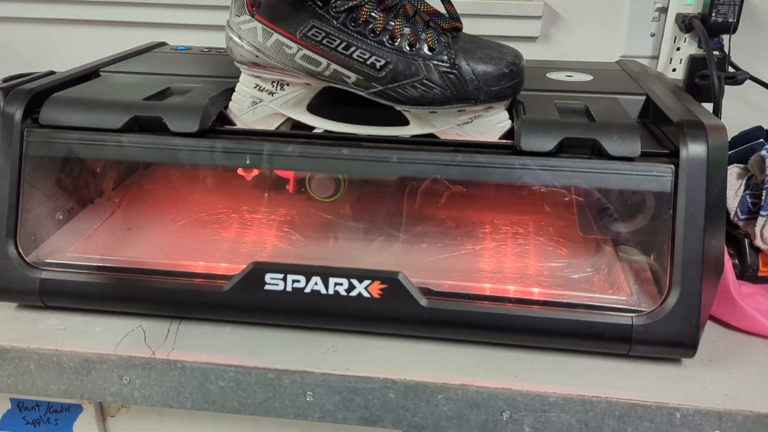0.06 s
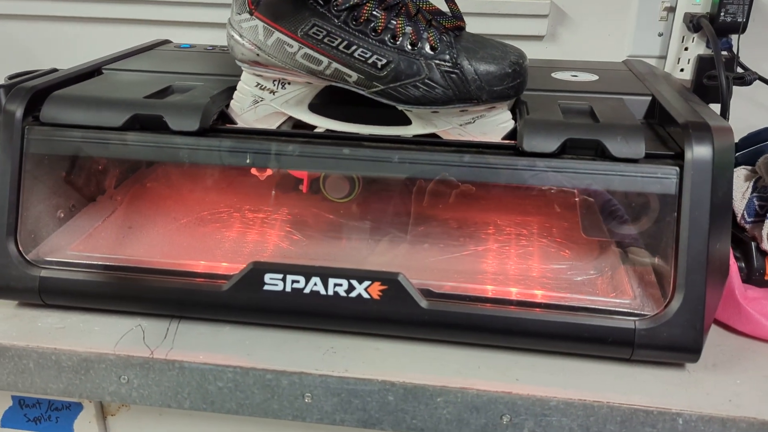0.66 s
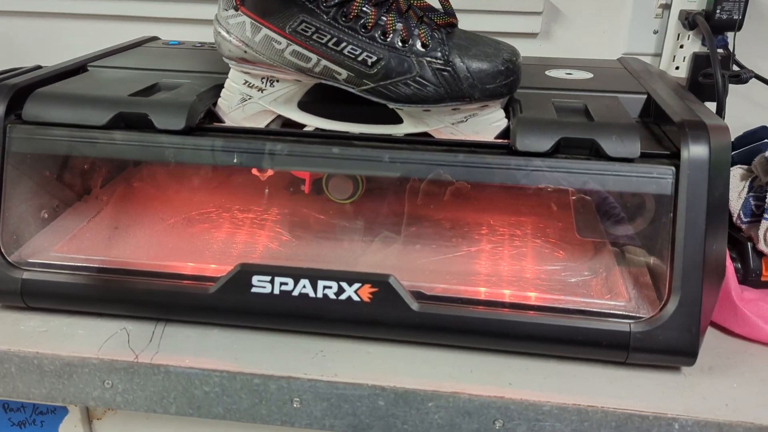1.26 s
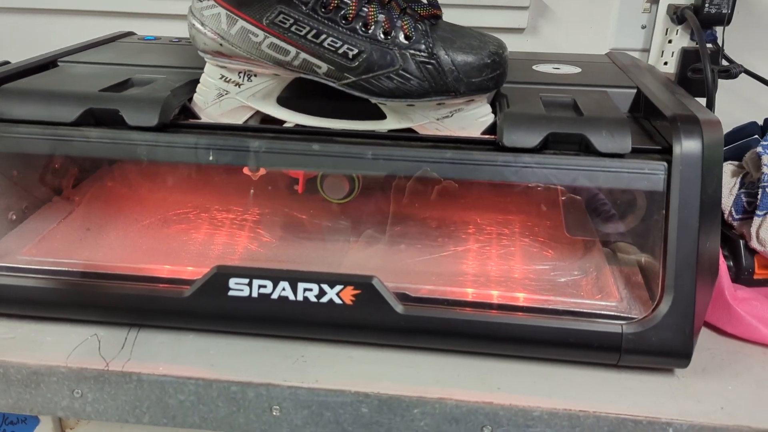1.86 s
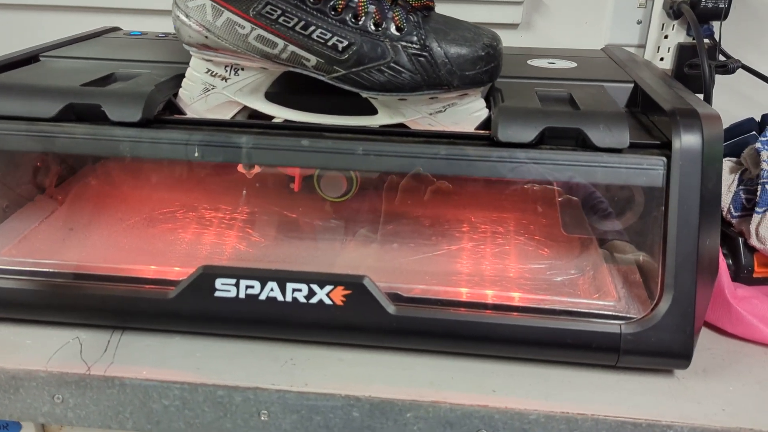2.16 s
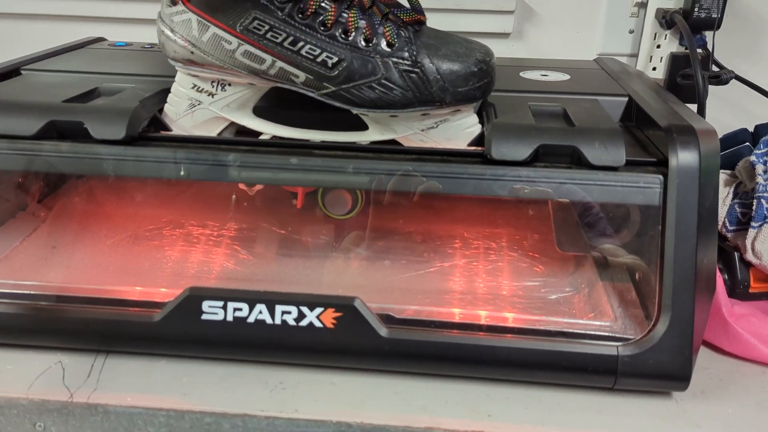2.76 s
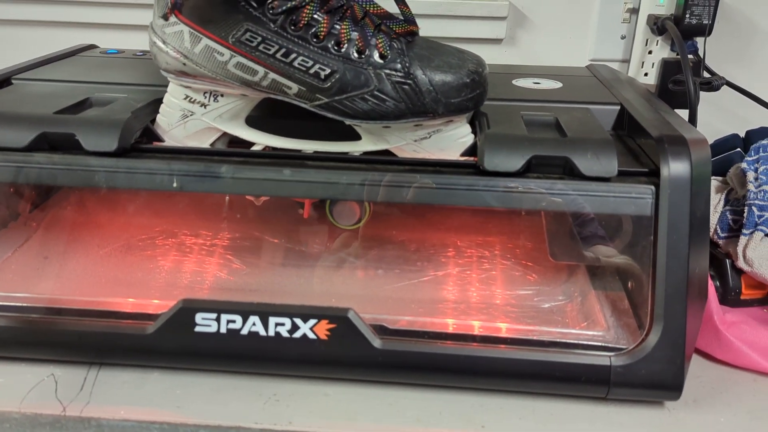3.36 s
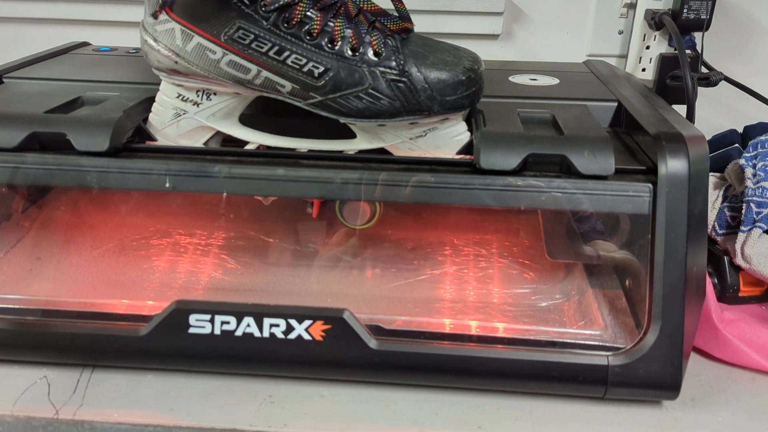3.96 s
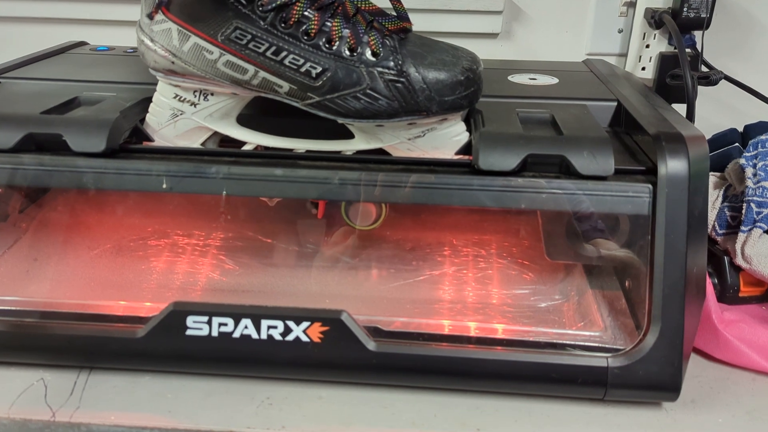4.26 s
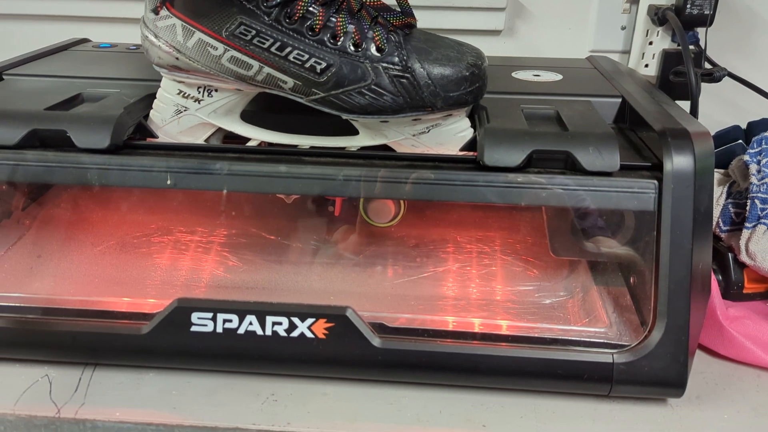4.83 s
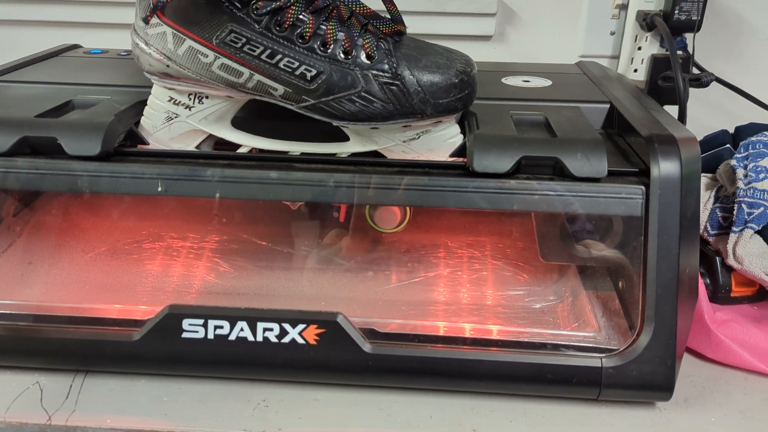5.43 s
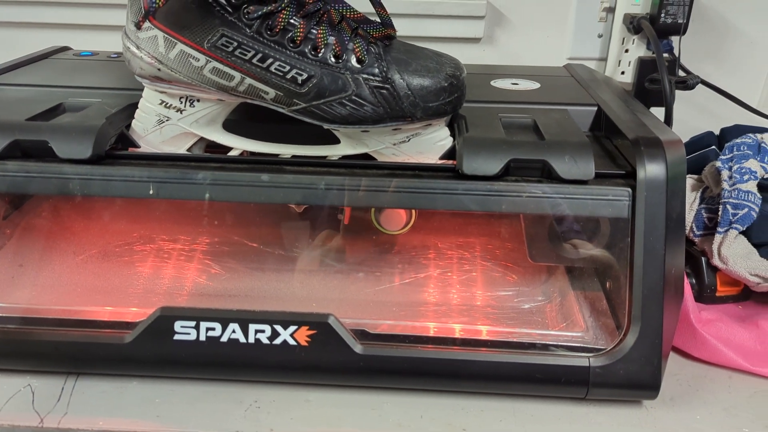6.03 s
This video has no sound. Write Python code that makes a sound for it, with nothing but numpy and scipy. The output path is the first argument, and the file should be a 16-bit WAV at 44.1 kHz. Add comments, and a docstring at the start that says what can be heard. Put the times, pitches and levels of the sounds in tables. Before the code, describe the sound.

An electric skate sharpener hums and buzzes steadily as its wheel grinds a steel blade, turning rougher, with hiss and rattling.

```python
"""A motor hums and buzzes over a soft rush of air: an electric skate sharpener and its dust fan.
The motor pulses about 120 times a second. Its grinding wheel touches the blade and travels along it,
so the steel rasps, rings and hisses, and the sound drifts from the left toward the middle.
As the wheel presses harder, its off-balance shaft beats against the hum, turning it rough,
and the plastic cabinet rattles in a small workshop."""
import sys
import numpy as np
from scipy import signal
from scipy.fft import rfft, irfft
from scipy.io import wavfile
from scipy.ndimage import uniform_filter1d

SR = 44100
rng = np.random.default_rng(int(sys.argv[2]) if len(sys.argv) > 2 else 0)


def bounce(signal):
    """Save signal as a 16-bit WAV file at the path given by the first command-line argument."""
    frames = np.transpose(np.atleast_2d(signal))
    limited = np.clip(frames, -1, 1)
    pcm = np.round(limited * 32767).astype(np.int16)
    wavfile.write(sys.argv[1], SR, pcm)


N = 268566
T = np.arange(N) / SR
FREQS = np.arange(N // 2 + 1) * SR / N
SIDES = np.array([[1], [-1]])  # plus for left, minus for right

# Tone colours, showing which pitches are strong and which are weak: pitch_hz, relative_db
AIR_COLOUR = [(28, -47), (42, -18.5), (80, -18), (130, -12), (190, -4.5), (250, -13), (330, -13.5),
              (800, -15), (2000, -21.5), (3400, -30.5), (6000, -32)]  # air rushing through the fan
GRIT_COLOUR = [(400, 10), (1200, 9.5), (2100, 12), (3200, 11), (4300, 16.5), (5700, -8), (6700, 4),
               (9600, -20), (11500, 3), (15500, -20)]  # grit scraping steel
BUZZ_COLOUR = [(2000, -3), (2500, 3), (3300, -3.5), (4100, 4.5), (4900, -4), (5700, -14.5), (6400, 4.5),
               (7300, -1.5), (8600, 6), (9600, -4), (10700, 4.5), (13000, 5), (14400, 2.5), (15400, -1)]  # the wheel ticking on the blade
COVER_COLOUR = [(400, -22), (700, -5), (1120, -18.5), (1420, -1), (1950, -0.5), (2500, -4.5), (3200, -16.5),
                (4200, -20.5), (5700, -17.5), (7000, -12), (9500, -17.5), (15000, -31)]  # the thin cover rattling
HOUSING_COLOUR = [(250, -27), (420, -9), (540, -4.5), (660, -4), (830, -8), (1000, -10), (1130, -16.5),
                  (1400, -2), (1800, -6.5), (3000, -38.5)]  # the housing growling
# How much the two ears differ, compared with what they share: pitch_hz, difference_db
STEREO_WIDTH = [(60, -5), (150, -65), (250, -18.5), (500, -9), (1000, -5), (2000, 0), (4000, 0),
                (15000, 2.5)]
# Tones of the dust fan: pitch_hz, level_db
FAN_TONES = [(273.5, -45.5), (368.3, -44)]
# Rings of wheel and blade, each swelling as the wheel passes its place:
# pitch_hz, width_hz, loudest_s, spread_s, level_db, left_minus_right_db
STEEL_RINGS = [(2776, 100, 6.5, 1.5, -43, 16), (2900, 640, -1.5, 2.7, -48, 18),
               (2920, 100, 0.2, .55, -47, -4), (3770, 46, 6, 2.5, -49, -14), (3760, 77, 0.35, 1.2, -42, -2),
               (4350, 800, 1, 1.5, -48, -2), (4462, 170, 4, 1.54, -41.5, -3), (4860, 60, 3.3, .8, -48, 0),
               (5240, 190, 2.9, 1.5, -40, 3), (6120, 830, 8, 1.2, -44, 5), (6100, 60, 1.2, 0.59, -48, -6),
               (6433, 400, 4, 0.87, -45.5, 15.5), (6720, 76, 1.8, 0.32, -42.5, 1),
               (6730, 240, 5.5, .6, -40, -9), (6760, 380, 1.7, 1.6, -38, -5.5),
               (7350, 67, 2, 1.5, -43.5, 1), (8140, 740, 1.5, .8, -43, 0), (8230, 800, 6, 0.66, -39.5, 0),
               (9240, 220, 2, 1.8, -47, 10), (10200, 350, -0.7, 1.2, -37, 1),
               (10266, 300, 3, 0.68, -40, -3), (10270, 270, 4.5, 0.32, -38.5, 0),
               (10870, 60, 0, .43, -49, -6), (11105, 200, .95, .85, -38, 0),
               (11041, 320, 3.5, .6, -40.5, 1), (11075, 300, 5.75, .53, -34.8, -3),
               (11850, 110, -1, 1.4, -40.5, 5), (11850, 60, 6, .63, -47, 2), (12700, 61, 1, 2, -44, 9),
               (13000, 900, 7, 3.9, -47, 15), (14300, 210, 0, 2.8, -45, 2)]
# Rings that rasp in turn as the wheel digs in: pitch_hz, width_hz, loudest_s, spread_s, level_db
RASP_RINGS = [(2095, 1050, 1.2, 0.34, -39.5), (1973, 1150, 1.84, 0.25, -39.5), (2160, 460, 2.54, 0.26, -36),
              (1960, 700, 3.2, 0.48, -34.5), (7850, 1100, 1.7, 0.45, -46)]
# Tones made by hum and shaft together: pulse_multiple, shaft_multiple, level_db
BEAT_TONES = [(0, 1, -42), (1, 1, -42), (2, 1, -53), (3, 1, -37.8), (3, 2, -43), (4, 1, -31.3), (4, 2, -42),
              (5, -1, -41), (5, 1, -44), (6, -2, -41), (6, -1, -40), (6, 1, -48), (7, -1, -47),
              (7, -3, -48.5), (7, 1, -50), (7, 2, -48.5), (8, -4, -52), (8, -1, -55), (9, -3, -48),
              (9, -1, -46), (9, 1, -44), (10, -2, -48.5), (12, -1, -47.5), (13, 1, -46)]
# The hum's harmonics (tones at whole multiples of the pulse rate): multiple, smooth_db, chattering_db
HUM_HARMONICS = [(1, -33.5, -31), (3, -48, -45.5), (4, -45, -33.5), (5, -42.5, -36.5), (6, -44.5, -42.5),
                 (7, -44.5, -36.5), (8, -59.5, -39), (9, -51.5, -65), (10, -40, -38.5), (11, -43, -63),
                 (12, -31.5, -35.5), (13, -50, -69), (14, -29.5, -44), (15, -36, -45), (16, -32.5, -40),
                 (17, -39, -39.5), (18, -47.5, -54.5), (19, -44, -56), (20, -40.5, -53), (23, -48, -47)]
# Harmonics swell or sink as the wheel passes the cabinet's lively and still spots:
# multiple, centre_s, spread_s, added_db
HUM_SWELLS = [(4, 2.94, 0.556, -9), (7, 5.55, 0.87, -7.5), (8, 2.07, 0.535, 10.5), (8, 3.33, 0.65, -12),
              (9, 0.23, 0.546, 7), (10, 2.23, 0.6, 5.5), (12, 1.9, 0.55, -5.5), (14, 0.54, 0.274, -4),
              (14, 2.1, 0.466, -8), (14, 6.54, 1.01, 3.5), (15, 1.99, 1.04, -9), (15, 5.93, 0.68, 5),
              (16, 0.587, 0.51, 6), (16, 3.0, 0.5, 7.5), (16, 4.1, 0.85, 11.5)]

PULSE_HZ, SHAFT_HZ = 119.72, 87.9  # motor pulses and shaft turns each second
TOUCH_S, LOAD_S, TOE_S = 0.82, 2.6, 5.1  # the wheel meets the blade, presses in, climbs its curved toe
# Each part's starting level and what each stage adds at a strength of 1:
# start_db, touch_db, bite_db, load_db, toe_db
AIR_DB = (-37.5, 2.5, 0, 2.5, 1)
HISS_DB = (-55, -1.5, 1.5, 21.5, -8)
BUZZ_DB = (-37.5, -0.34, 1.8, 0, 1)
RATTLE_DB = (-54, 12, 1, 0.95, 6.5)
BODY_DB = (-27, 0.5, -1, 5.5, 1.5)  # the hum's second harmonic
BOOM_DB = (0.5, 12.5, 4.5, 6.5, 2)  # the front panel's boost, which fades out once the wheel chatters


def undb(db):
    """Turn decibels into a number to multiply a sound by."""
    return 10 ** (np.asarray(db) / 20)


def unit(x):
    """Scale a sound to an average (rms) strength of 1."""
    return x / np.sqrt(np.mean(x ** 2))


def shape(points, hz):
    """Read a table of pitch_hz, level_db as a gain at the given pitches."""
    pitches, db = np.transpose(points)
    return undb(np.interp(np.log(hz + 1e-3), np.log(pitches), db))


def bell(hz, centre_hz, width_hz):
    """How strongly a ringing part answers a pitch: 1 at its centre, less to either side."""
    return 1 / (1 + (2 * (hz - centre_hz) / width_hz) ** 2)


def wander(rate_hz):
    """A smooth random drift, typically about 1 above or below zero."""
    hold = int(SR / rate_hz)
    steps = np.repeat(rng.standard_normal(N // hold + 2), hold)
    return 1.2555 * uniform_filter1d(uniform_filter1d(steps, hold), hold)[:N]


def rise(at_s, rise_s):
    """A smooth step from 0 to 1, halfway up at at_s."""
    return .5 + .5 * np.tanh((T - at_s) / rise_s / 2)


def radiate(pair, gain):
    """Colour two sounds: one is shared by both ears (at strength 1), the other sets them apart."""
    mid = irfft(rfft(pair[0]) * gain, N)
    side = irfft(rfft(pair[1]) * gain * shape(STEREO_WIDTH, FREQS), N)
    return np.array([mid + side, mid - side]) / np.std(mid)


def clicks(times_s, sizes):
    """Clean clicks that can fall between two samples."""
    at = times_s[:, None] * SR
    index = np.floor(at).astype(int) + np.arange(-7, 9)
    click = np.sinc(index - at) * np.sinc((index - at) / 8)
    inside = (index >= 0) & (index < N)
    return np.bincount(index[inside], (sizes[:, None] * click)[inside], N)


def cabinet(strikes, ring_s, room_db, rise_s=0.0016, echo_s=0.28):
    """Strikes leave the cabinet by two paths, each a short ring followed by the workshop's echo."""
    t = T[:SR // 4]
    ring = unit((1 - np.exp(-t / rise_s)) * np.exp(-t / ring_s))
    echo = unit(np.exp(-np.log(1000) * t / echo_s))
    paths = rfft(rng.standard_normal((2, len(t))) * (ring + undb(room_db) * echo))
    # many overlapping rings share the energy evenly from low to high
    paths = paths / np.sqrt(uniform_filter1d(abs(paths) ** 2, size=60))
    return irfft(rfft(strikes) * rfft(irfft(paths), N), N)


def lateness(hz):
    """Higher tones leave the cabinet later, by this share of a pulse."""
    return 0.1952 * np.clip((hz - 300) / 900, 0, 1)


def dust_fan(air_db, gust_db=3.0):
    """The fan makes a low rush of air and two wavering tones."""
    air = radiate(rng.standard_normal((2, N)), shape(AIR_COLOUR, FREQS))
    air *= undb(air_db + gust_db * np.tanh(wander(7.5)))
    for hz, db in FAN_TONES:
        level = np.sqrt(2) * undb(db + 0.83 * wander(4.27))
        pitch_hz = hz * (1 + 0.00315 * wander(1.8))
        air += level * np.sin(2 * np.pi * np.cumsum(pitch_hz) / SR)
    return air


def grit_hiss(pulses, turns, chop=0.12, wobble=0.099):
    """Grit scrapes the steel, a little harder with each motor pulse and each shaft turn."""
    contact = np.exp(chop * np.cos(2 * np.pi * (pulses - .4)) + wobble * np.sin(2 * np.pi * turns))
    scrape = rng.standard_normal((2, N)) * contact * undb(.3 * wander(14))
    return radiate(scrape, shape(GRIT_COLOUR, FREQS))


def steel_rings(pulses, turns, load, sway=0.25, waver_db=1.74, wave_size=32768):
    """Each ring of wheel and blade sings on the few motor harmonics that lie near its pitch."""
    out = np.zeros((2, N))
    # one stored wave repeats every pulse, peaking shortly after it
    place = ((pulses - .3) * wave_size).astype(int) % wave_size
    for hz, width_hz, at_s, spread_s, db, lean_db in STEEL_RINGS:
        swell = undb(db + waver_db * wander(4.04)) / np.sqrt(1 + ((T - at_s) / spread_s) ** 4)
        # under load the contact sways as pulses and turns slip in and out of step
        drift = sway * load * np.sin(2 * np.pi * (pulses - turns + rng.random()))
        nearby = round(hz / PULSE_HZ) + np.arange(-4, 5)
        gains = bell(nearby * PULSE_HZ, hz, width_hz)
        angles = 1.104 * rng.standard_normal(len(nearby))
        harmonics = np.zeros(wave_size, complex)
        harmonics[nearby] = gains / np.linalg.norm(gains) * np.exp(1j * angles)
        ring = wave_size * np.fft.ifft(harmonics)[place] * swell * np.exp(1j * drift)
        # the two ears hear it a quarter of a wave apart
        ears = np.array([ring.real, rng.choice([-1, 1]) * ring.imag])
        out += np.sqrt(2) * undb(lean_db * SIDES / 2) * ears
    return out


def wheel_rasp(pulse_s, pan_db, jitter_s=0.00012, scatter_db=3.0, rebound_db=-3):
    """The wheel skips unevenly on the steel, twice a pulse, waking one ring after another."""
    chance = rng.standard_normal((len(pulse_s), 4)).T
    skips = clicks(pulse_s + jitter_s * chance[0], undb(scatter_db * chance[1]))
    rebound_s = pulse_s + .5 / PULSE_HZ + jitter_s * chance[2]
    skips += clicks(rebound_s, undb(rebound_db + scatter_db * chance[3]))
    ring = cabinet(skips, ring_s=.0018, room_db=-4, rise_s=.0004)
    out = 0
    for hz, width_hz, at_s, spread_s, db in RASP_RINGS:
        lean_db = pan_db * bell(hz, centre_hz=2050, width_hz=2000)
        swell = np.exp(-((T - at_s) / spread_s) ** 2 / 2)
        out += radiate(ring, bell(FREQS, hz, width_hz) ** 2) * undb(db + lean_db * SIDES) * swell
    return out * rise(TOUCH_S, 0.058)


def blade_buzz(pulse_s, load, jitter_s=1.0e-5, scatter_db=4.5, spots=6):
    """Wheel and blade tick together three times a pulse, less evenly under load."""
    uneven = 0.25 + .8 * np.interp(pulse_s, T, load)
    ticks = 0
    for lag_s, db in [(0, 7.5), (.0028, 5.7), (.0056, 0.5)]:
        chance = rng.uniform(-1.51, 1, (len(pulse_s), 2)).T * uneven
        ticks += clicks(pulse_s + lag_s + jitter_s * chance[0], undb(db + scatter_db * chance[1]))
    # the paths out of the cabinet change as the wheel travels from spot to spot
    place = np.linspace(0, spots - 1, N)
    ring = 0
    for spot in range(spots):
        nearness = np.sqrt(np.maximum(1 - abs(place - spot), 0))
        ring += nearness * cabinet(ticks, ring_s=0.002, room_db=9, rise_s=0.00034)
    return radiate(ring, shape(BUZZ_COLOUR, FREQS))


def panel_slaps(pulse_s, turns, load, lag_s=0.001198, swing_s=0.000626, jitter_s=2.2e-5):
    """A loose panel slaps once a pulse, earlier and harder when the off-balance shaft pushes too."""
    angle = 2 * np.pi * np.interp(pulse_s, T, turns)
    chance = rng.standard_normal((len(pulse_s), 2)).T
    times_s = pulse_s + lag_s - swing_s * np.sin(angle) + jitter_s * chance[0]
    rock_db = 4 * np.sin(angle + 0.56)
    scatter_db = 1.9 * chance[1]
    surge_db = np.interp(pulse_s, T, 0.5 * load * wander(17))
    return clicks(times_s, undb(rock_db + scatter_db + surge_db))


def cover_rattle(slaps, load, chatter, rattle_db, pan_db, growl_db=-37):
    """Slaps ring the thin cover, harder under load; once the wheel chatters the housing growls too."""
    ring = cabinet(slaps, ring_s=.003, room_db=-5.5)
    cover = radiate(ring, shape(COVER_COLOUR, FREQS))
    cover *= undb(rattle_db - 0.5 + 7.44 * load + 1.06 * pan_db * SIDES)
    ring = cabinet(slaps, ring_s=.0029, room_db=-6, rise_s=.0005)
    housing = radiate(ring, shape(HOUSING_COLOUR, FREQS))
    return cover + housing * chatter * undb(growl_db + .5 * SIDES)


def shaft_beats(pulses, turns):
    """The off-balance shaft rocks the humming motor once a turn, adding tones between its harmonics."""
    out = np.zeros((2, N))
    for pulse_multiple, shaft_multiple, db in BEAT_TONES:
        harmonic_hz = pulse_multiple * PULSE_HZ
        angle = 2 * np.pi * (pulse_multiple * (pulses - lateness(harmonic_hz)) + shaft_multiple * turns)
        # the rocking sways the timing more than the level, so the drone stays dense
        angle += np.pi / 2 * shaft_multiple ** 2 + 0.5 * rng.standard_normal()
        apart = np.arctan(shape(STEREO_WIDTH, harmonic_hz + shaft_multiple * SHAFT_HZ))
        out += undb(db + 0.72 * wander(3.013)) * np.cos(angle + apart * SIDES)
    return np.sqrt(2) * out


def motor_hum(pulses, turns, chatter, body_db, boom_db, pan_db, waver_db=0.7, throb=0.42, churn_db=3.0):
    """Magnetic pulses make clean harmonics whose mix shifts as the wheel moves and starts to chatter."""
    levels = {k: smooth_db + chatter * (rough_db - smooth_db) for k, smooth_db, rough_db in HUM_HARMONICS}
    for k, at_s, spread_s, db in HUM_SWELLS:
        levels[k] += db * np.exp(-((T - at_s) / spread_s) ** 2)
    levels[2] = body_db
    boom_hz = np.minimum(448 + 92 * T, 800)  # the front panel booms higher as the wheel moves along
    out = np.zeros((2, N))
    for k, db in levels.items():
        hz = k * PULSE_HZ
        if k > 2:
            db = db + boom_db * bell(hz, boom_hz, width_hz=361)
            db += waver_db * min(hz / 1000, 2) * wander(2.465)
            # three pulses slip against four turns, so one cabinet ring churns 7 to 8 times a second
            churn = np.cos(2 * np.pi * (3 * pulses - 4 * turns) + rng.standard_normal())
            db += churn_db * chatter * bell(hz, centre_hz=1430, width_hz=500) * churn
        # three turns slip against two pulses, so the upper harmonics throb
        slip = np.cos(2 * np.pi * (3 * turns - 2 * pulses + rng.random()))
        flutter = 1 + throb * chatter * min(hz / 1900, 1) ** 2 * slip
        # higher harmonics are smeared and reach the two ears out of step
        smear = min(hz / 900, 1) * 0.7 * rng.standard_normal()
        angle = 2 * np.pi * k * (pulses - lateness(hz)) + smear
        # the wheel's own ring sings from one spot, so there the ears are more alike
        focus = .7 * chatter * bell(hz, centre_hz=1913, width_hz=80)
        apart = np.arctan(shape(STEREO_WIDTH, hz)) * (1 - focus)
        lean_db = 0.5 + pan_db * bell(hz, centre_hz=1850, width_hz=850)
        ears = undb(lean_db * SIDES / 2)
        ears /= np.sqrt(np.mean(ears ** 2, axis=0))
        out += flutter * undb(db) * ears * np.cos(angle + apart * SIDES)
    return np.sqrt(2) * out


def scene():
    """One pass along the blade: pulses and turns set the rhythm, the stages set the levels."""
    touch, pressing, toe = rise(TOUCH_S, 0.27), rise(LOAD_S, .43), rise(TOE_S, 0.273)
    bite = (4 * pressing * (1 - pressing)) ** 2  # strongest while the load grows fastest
    load = .92 * pressing
    chatter = rise(LOAD_S, 0.2)  # the smooth hum quickly turns rough
    stages = np.array([np.ones(N), touch, bite, load, toe])
    levels = np.array([AIR_DB, HISS_DB, BUZZ_DB, RATTLE_DB, BODY_DB, BOOM_DB])
    air_db, hiss_db, buzz_db, rattle_db, body_db, boom_db = levels @ stages

    pulse_hz = PULSE_HZ - .31 * np.sqrt(bite) - .16 * load  # the rate sags as the wheel works
    pulses = np.cumsum(pulse_hz) / SR  # running counts of motor pulses and shaft turns
    turns = np.cumsum(SHAFT_HZ * (1 + 0.001052 * wander(2.035))) / SR
    pulse_s = np.interp(np.arange(int(pulses[-1]) + 1), pulses, T)  # the moment of each pulse
    pan_db = np.linspace(9.5, 0.5, N)  # a shrinking lean to the left, scaled by each part that uses it
    churn_db = 1.1 * load * np.cos(2 * np.pi * (3 * pulses - 4 * turns))

    out = motor_hum(pulses, turns, chatter, body_db, boom_db * (1 - chatter), pan_db)
    out += shaft_beats(pulses, turns) * chatter * np.sqrt(load)
    out += dust_fan(air_db)
    out += blade_buzz(pulse_s, load) * undb(buzz_db + 0.53 * churn_db + 0.48 * SIDES)
    out += steel_rings(pulses, turns, load)
    out += wheel_rasp(pulse_s, pan_db)
    slaps = panel_slaps(pulse_s, turns, load)
    out += cover_rattle(slaps, load, chatter, rattle_db, pan_db) * undb(churn_db)
    out += grit_hiss(pulses, turns) * undb(hiss_db + churn_db + 0.46 * SIDES)
    return out


def record(dry):
    """Cut away the very highest treble."""
    top_hz = 15500
    return signal.sosfilt(signal.ellip(8, .2, 70, top_hz, fs=SR, output="sos"), dry)


dry = scene()
out = record(dry)
bounce(out)
```